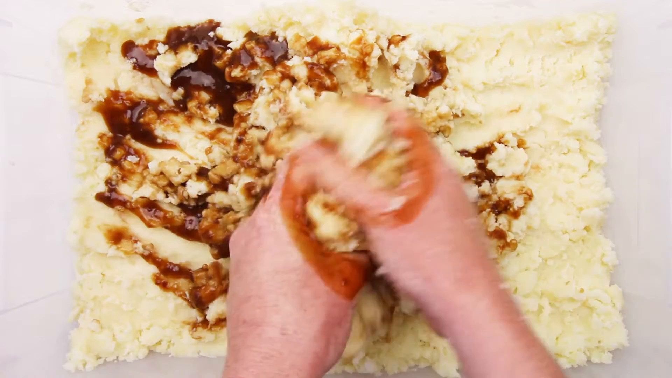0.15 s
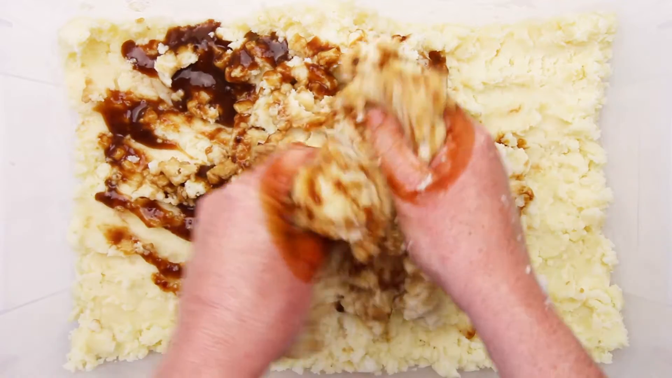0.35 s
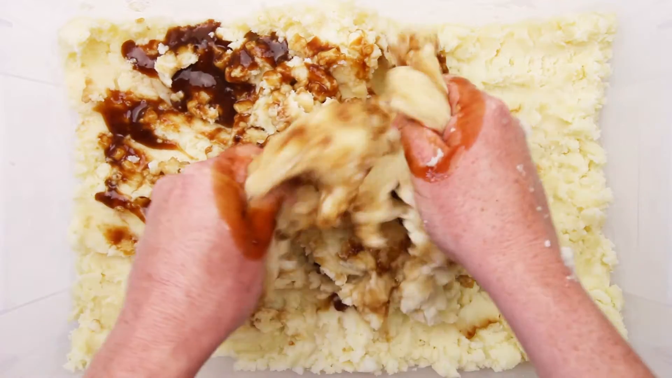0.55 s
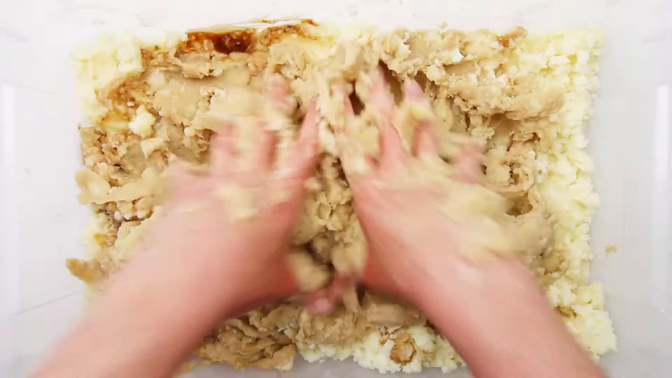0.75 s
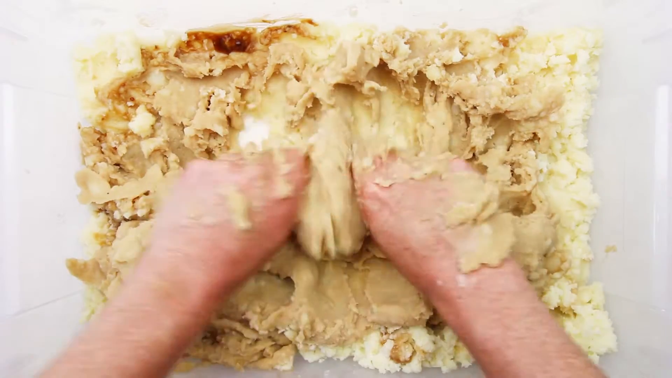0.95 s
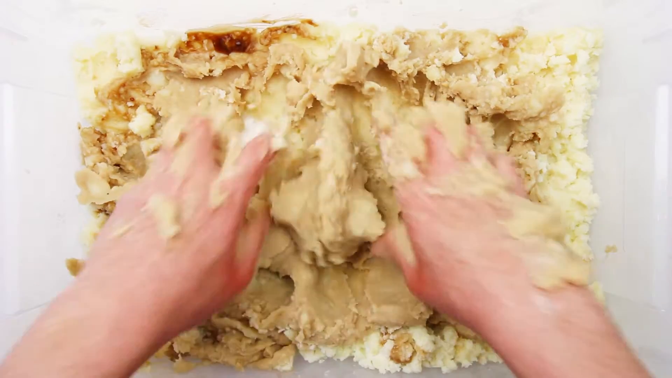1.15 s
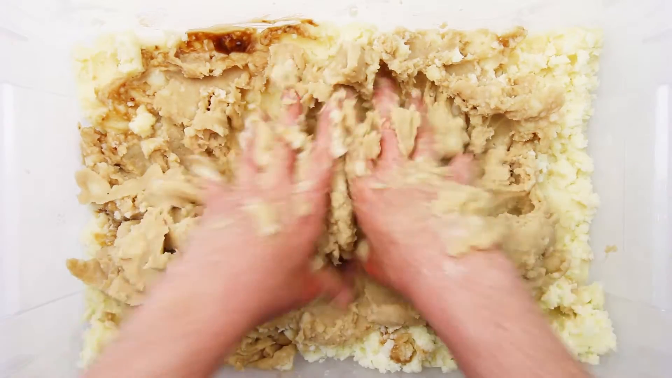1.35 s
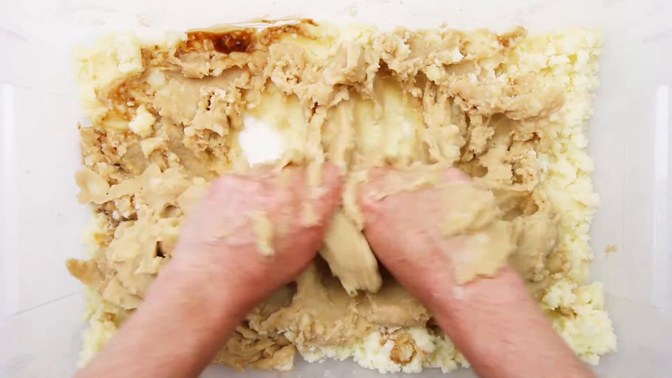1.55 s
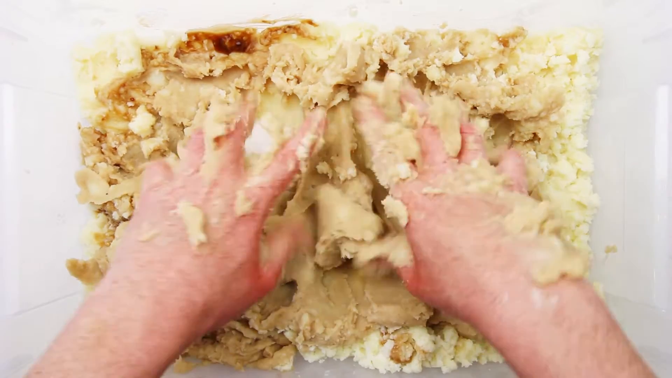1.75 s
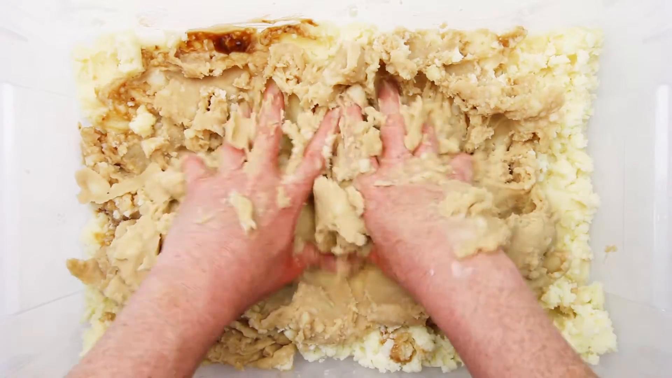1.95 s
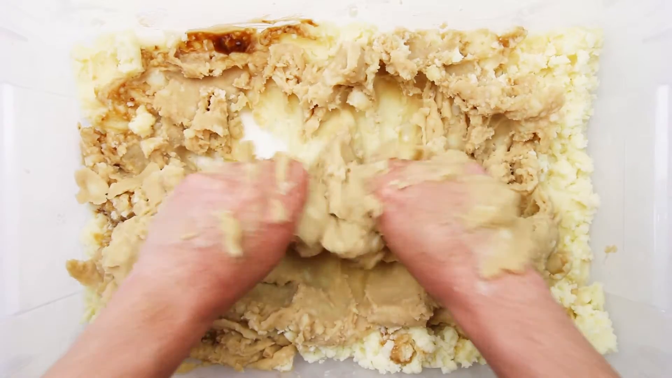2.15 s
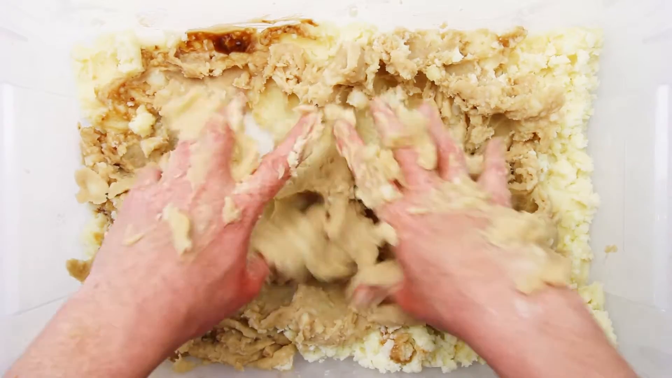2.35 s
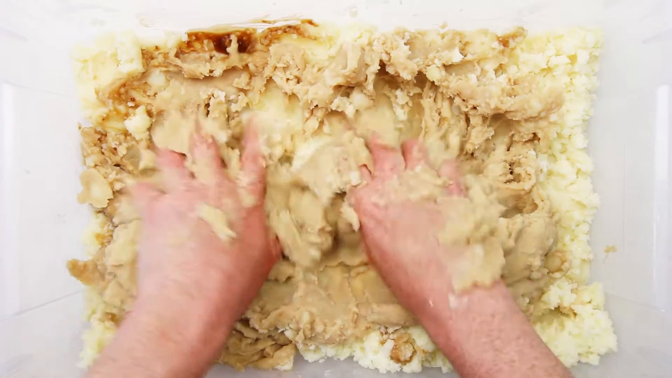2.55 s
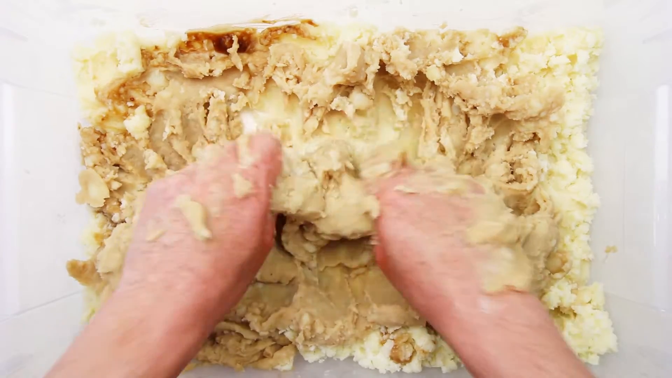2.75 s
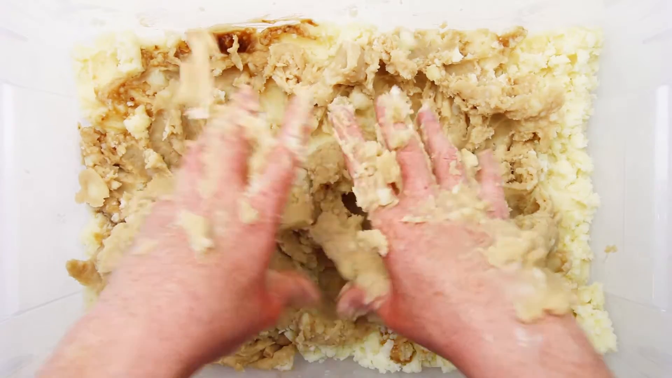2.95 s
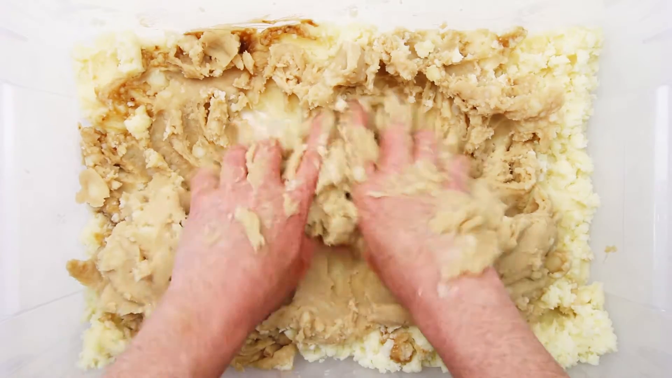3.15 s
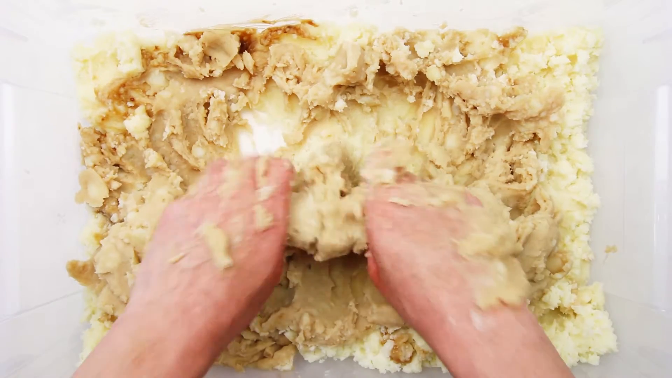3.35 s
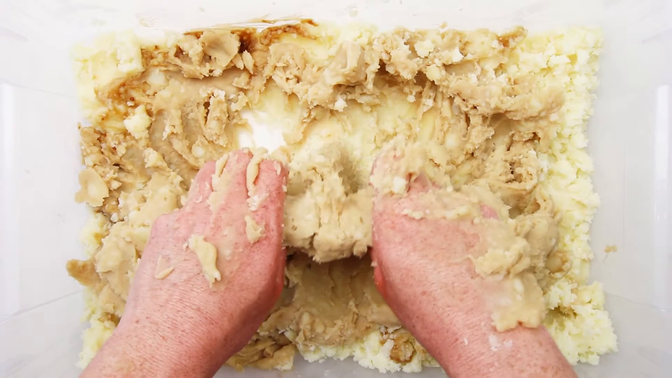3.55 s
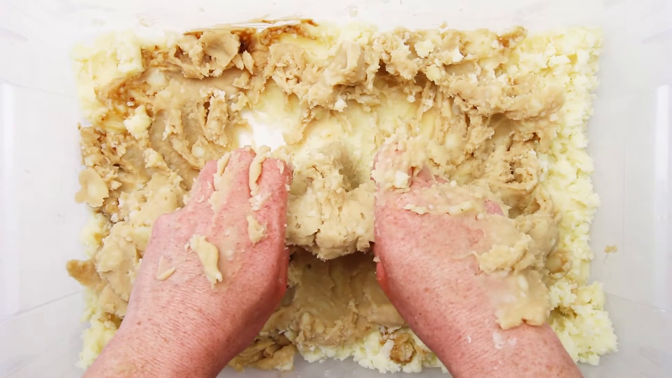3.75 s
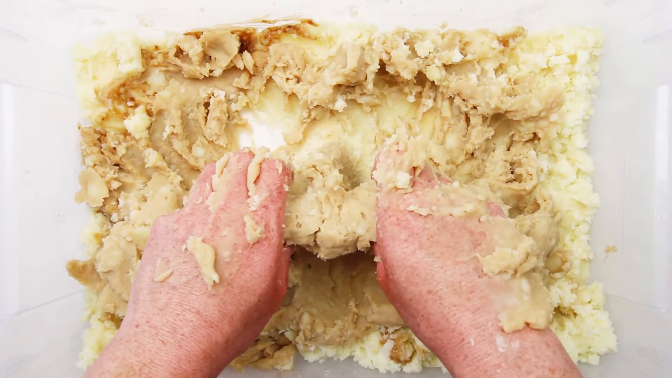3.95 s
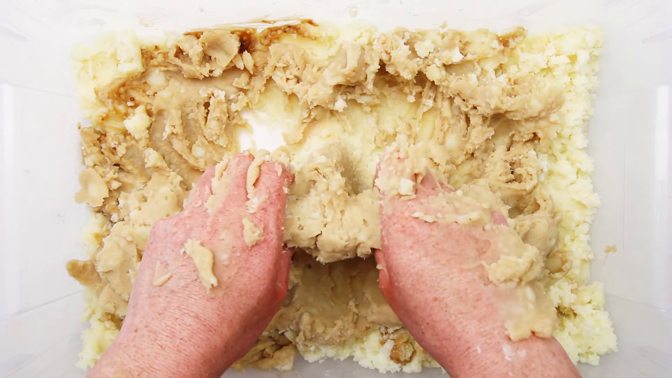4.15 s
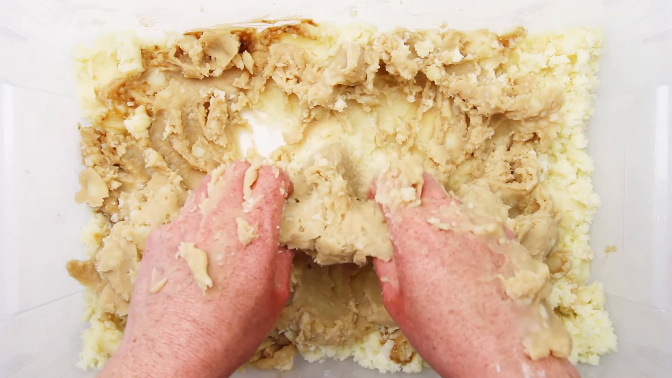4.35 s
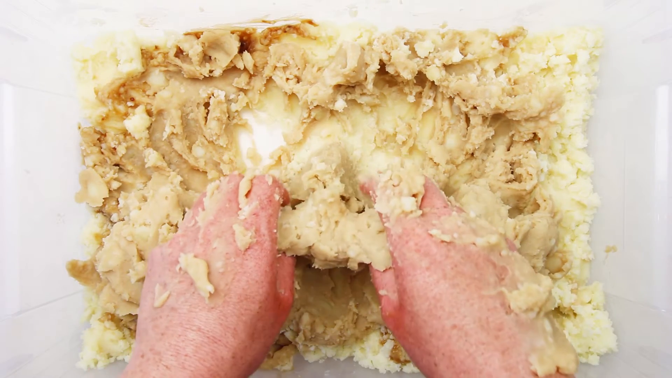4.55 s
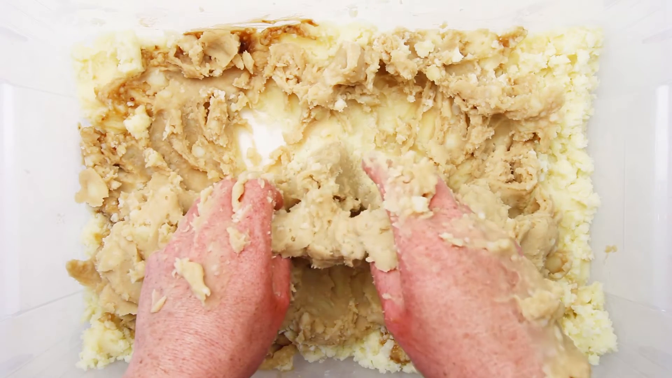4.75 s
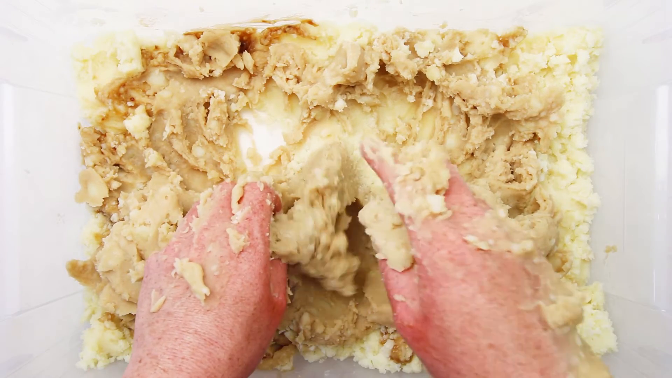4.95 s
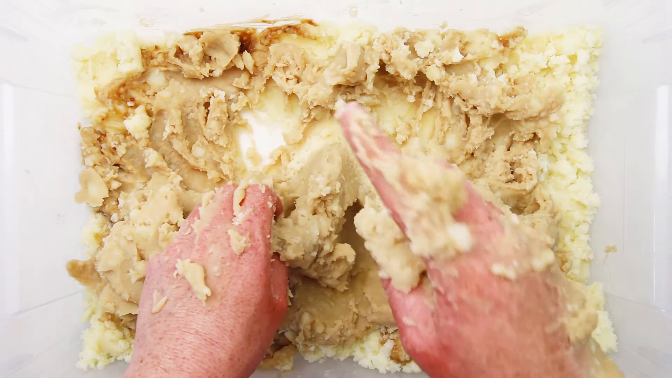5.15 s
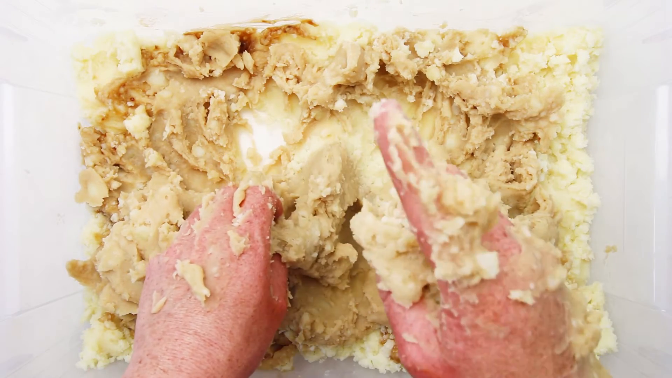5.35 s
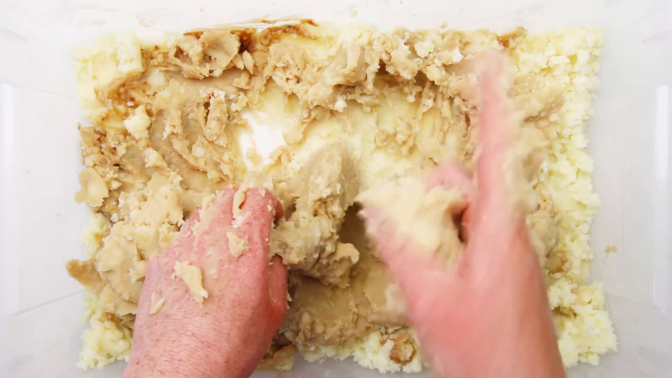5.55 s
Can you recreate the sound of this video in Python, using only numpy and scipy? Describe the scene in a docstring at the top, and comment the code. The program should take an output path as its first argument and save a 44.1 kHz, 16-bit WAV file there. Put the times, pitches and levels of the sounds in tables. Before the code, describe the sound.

Close, gooey kneading of thick wet paste with smacks, bubbly pops and spurts, fading after several squeezes to near quiet over soft hum.

```python
"""Bare hands knead wet mashed potato in a plastic tub close to a microphone, six squeezes in 3.4 s, then almost rest.
Each squeeze starts with tiny bubbles fizzing and wet films squelching (clumped noise bursts, short sines);
skin smacks free (filtered bursts), paste spurts (soft noise swells) and air pockets pop (sines rising in pitch).
After 3.6 s only faint fizz, small peels, smacks, pops and one weak spurt remain.
Throughout, a small hard room answers (decaying noise) and a motor hums far away over the hiss of the room."""
import sys
import numpy as np
from scipy import signal
from scipy.fft import rfft, irfft, next_fast_len
from scipy.io import wavfile
from scipy.ndimage import map_coordinates

SR = 44100
rng = np.random.default_rng(int(sys.argv[2]) if len(sys.argv) > 2 else 0)


def unload_audio(sound):
    """Save the sound as a 16-bit wav file, at the path given as the first command line argument."""
    columns = np.transpose(np.atleast_2d(sound))
    # keep every value between -1 and 1, then stretch to whole-number steps
    steps = np.round(np.clip(columns, -1, 1) * 32767)
    wavfile.write(sys.argv[1], SR, steps.astype(np.int16))


N = 246959  # samples
CLOCK = np.arange(0, N / SR + .002, .001)  # seconds, the time grid of the gestures


def amp(db):
    """Gain of a level in dB."""
    return 10 ** (np.asarray(db) / 20)


def unit(x):
    """Scaled to rms 1."""
    return x / np.sqrt(np.mean(x ** 2) + 1e-20)


def along(points, hz):
    """Values at hz, read between (Hz, value) points on a log frequency axis."""
    point_hz, value = np.transpose(points)
    return np.interp(np.log(hz + 1), np.log(point_hz + 1), value)


def wobble(rate):
    """A smooth random curve, rate knots a second."""
    knots = rng.standard_normal(int(N * rate / SR) + 4)
    return map_coordinates(knots, [np.arange(N) * rate / SR])


def coloured(x, spectrum):
    """x through a causal minimum-phase filter of energy 1, shaped like the spectrum."""
    size = 4096
    gain = amp(along(spectrum, np.fft.rfftfreq(size, 1 / SR)))
    # Folding the cepstrum onto positive time puts the energy at the start
    cepstrum = irfft(np.log(gain))
    cepstrum[1:size // 2] *= 2
    cepstrum[size // 2 + 1:] = 0
    kernel = irfft(np.exp(rfft(cepstrum)))[:size // 2]
    return signal.fftconvolve(x, kernel / np.linalg.norm(kernel))[:len(x)]


def bursts(shape, spiky_db):
    """Noise whose samples differ widely in size, rms 1."""
    boost_db = spiky_db * np.minimum(rng.exponential(size=shape[-1]), 5)
    return unit(rng.standard_normal(shape) * amp(boost_db))


def paste():
    """Each squeeze drives out small bubbles, works larger pockets and pushes the tub."""
    # Spectrum of the fizzing bubbles: frequency_hz, relative level_db [dB per Hz]
    fizz_spectrum = [(1200, -28), (2500, -11), (4000, -7.5), (6000, -2), (7300, 1), (8500, -5),
                     (10500, -15.5), (13000, -23.5), (15000, -48), (15600, -58)]
    # Spectrum of the squelching wet films: frequency_hz, relative level_db [dB per Hz]
    squelch_spectrum = [(120, -31), (300, 1.5), (600, 2.5), (1200, -3.5), (2200, -8), (4000, -7),
                        (8000, -35.5)]
    # Spectrum of the flexing tub floor: frequency_hz, relative level_db [dB per Hz]
    tub_spectrum = [(15, -1.5), (50, -20), (100, -14), (130, 1), (165, -14), (270, -11), (500, -44)]
    fizzing, squelching, pushing = effort()
    flow = wobble(25.04)  # shared by fizz and squelch
    fizz = fizzing * amp(1.16 * flow) * crackle(fizz_spectrum, spiky_db=4.0, clump_db=2.0, clump_rate=140)
    squelch = squelching * amp(0.72 * flow)
    squelch = squelch * crackle(squelch_spectrum, spiky_db=3.0, clump_db=4.0, clump_rate=70)
    push = pushing * crackle(tub_spectrum, spiky_db=3.0, clump_db=2.0, clump_rate=8.38)
    blips = bubbles(count=6700, centre_hz=2870, spread=0.602, cycles=1.03, spiky_db=4.5)
    blips = np.sqrt(fizzing * squelching) * amp(-4.0) * blips
    return fizz + blips + squelch + push


def effort():
    """Gains of fizz, squelch and push: the gestures of the hands over the settling paste."""
    # Squeezes: land_s, land_fizz_db, land_squelch_db (hands land), give_s, fizz_db, squelch_db (paste yields),
    # end_s (grip ends), weigh_s, push_db (full weight on the tub), lift_s (weight lifts)
    squeezes = [(0.07, -37.5, -45, 0.2, -42, -43, 0.36, 0.04, -57, 0.1),
                (0.94, -35.5, -35.5, 1.016, -36, -36.5, 1.115, 1, -45, 1.0),
                (1.509, -32.5, -37, 1.585, -36.5, -37.5, 1.70, 1.55, -42, 1.57),
                (2.046, -36, -39, 2.146, -38, -36, 2.296, 2.13, -48.5, 2.14),
                (2.617, -36.5, -36, 2.71, -35.5, -35, 2.816, 2.70, -44.5, 2.82),
                (3.233, -34.5, -44, 3.34, -34.5, -34, 3.35, 3.31, -43, 3.37)]
    # Hands peeling off or shifting without pressure: start_s, end_s, fizz_db, squelch_db, sag_db_per_s
    peels = [(0.0, 0.057, -46, -51, 10), (0.415, 0.77, -45.5, -55.5, 12), (1.205, 1.325, -37.5, -50.5, 74),
             (1.794, 1.895, -38.5, -56, 90), (2.384, 2.506, -37.5, -54, 65), (2.90, 3.01, -39, -52, 49.5),
             (3.432, 3.53, -43.5, -50, 66), (4.382, 4.437, -55, -74, 5), (4.65, 4.75, -59, -72, 20),
             (4.83, 4.925, -58, -69, 24), (5.13, 5.15, -58.5, -72, 20), (5.23, 5.25, -58, -75, 20)]
    # Slopes of each gesture: rise dB per s, sag dB per s while held, fall dB per s
    landing, yielding, weight = (710, 0, 152), (216, 40, 207), (250, 38, 170)
    peel_rise_db_per_s, peel_fall_db_per_s = 224, 238
    approach_db, approach_db_per_s = -15.5, 200  # fizz just ahead of a landing, relative to it
    squelch_sag = 1.44  # while the paste yields, the squelch sags faster than the fizz
    settling_fizz_db, settling_squelch_db, settling_push_db = -62, -65, -66  # between gestures
    still_s, still_fizz_db = 3.6, -69.5  # kneading has stopped

    # Gestures add up as powers
    kneading = CLOCK < still_s
    fizz = amp(np.where(kneading, settling_fizz_db, still_fizz_db)) ** 2
    squelch = kneading * amp(settling_squelch_db) ** 2
    push = kneading * amp(settling_push_db) ** 2
    rise, sag, fall = yielding
    for land, land_fizz_db, land_squelch_db, give, fizz_db, squelch_db, end, weigh, push_db, lift in squeezes:
        fizz = fizz + gesture(land, land, land_fizz_db + approach_db, approach_db_per_s, 0, fall)
        fizz = fizz + gesture(land, land, land_fizz_db, *landing)
        fizz = fizz + gesture(give, end, fizz_db, *yielding)
        squelch = squelch + gesture(land, land, land_squelch_db, *landing)
        squelch = squelch + gesture(give, end, squelch_db, rise, squelch_sag * sag, fall)
        push = push + gesture(weigh, lift, push_db, *weight)
    for start, end, fizz_db, squelch_db, peel_sag in peels:
        slopes = peel_rise_db_per_s, peel_sag, peel_fall_db_per_s
        fizz = fizz + gesture(start, end, fizz_db, *slopes)
        squelch = squelch + gesture(start, end, squelch_db, *slopes)
    return [np.interp(np.arange(N) / SR, CLOCK, np.sqrt(power)) for power in (fizz, squelch, push)]


def gesture(start, end, db, rise, sag, fall):
    """Power of a level that rises to db at start, sags until end, then falls."""
    before = np.maximum(start - CLOCK, 0)
    held = np.clip(CLOCK - start, 0, max(end - start, 0))
    after = np.maximum(CLOCK - max(end, start), 0)
    lost_db = rise * before + sag * held + fall * after
    return amp(db - lost_db) ** 2


def crackle(spectrum, spiky_db, clump_db, clump_rate):
    """Dense bursts that come in clumps, rms 1."""
    clumped = bursts((N,), spiky_db) * amp(clump_db * wobble(clump_rate))
    return unit(coloured(clumped, spectrum))


def bubbles(count, centre_hz, spread, cycles, spiky_db):
    """Scattered single bubbles, each a few cycles at its own pitch, rms 1."""
    draw, t = rng.random((count, 3)), np.arange(320) / SR
    hz = np.clip(centre_hz * np.exp(spread * rng.standard_normal((count, 1))), 900, 9000)
    size = amp(-spiky_db * np.log(draw[:, 1:2] + 0.012))
    size = size * np.sqrt(hz / centre_hz)  # long low bubbles start weaker
    ring = size * np.sin(2 * np.pi * hz * t) * np.exp(-t * hz / cycles)
    at = (draw[:, :1] * N).astype(int) + np.arange(len(t))
    return unit(np.bincount(at.ravel(), ring.ravel())[:N])


def breaks():
    """Skin tears free in smacks, bright over a lower slap; paste spurts in soft swells of bright and low noise."""
    # Wet skin tearing free: start_s, level_db (before filtering), low_part_db (relative, before the slap gain)
    smacks = [(0.0361, -11.5, -17), (0.1845, -25.5, -1), (0.2094, -22, -6), (0.2682, -21.5, -11),
              (0.3044, -24, -12), (0.3661, -24, -13), (0.384, -23, -4), (0.4693, -27, -5),
              (0.602, -28.5, -15), (0.6824, -27, -24), (0.7586, -20.5, -22), (0.9238, -21.5, -4),
              (0.9308, -6, -8), (1.1044, -14.5, -2.5), (1.305, -39, -15), (1.4887, -20, 1),
              (1.495, -6.5, -11.5), (1.5119, -16.5, -7.5), (1.5678, -21, -11), (1.941, -24.5, -18),
              (1.985, -36, -20), (2.0306, -29, -14), (2.05, -17, -11), (2.0735, -13, -6.5),
              (2.1362, -24, 5.5), (2.2333, -15.5, -9), (2.2535, -24.5, 3.5), (2.3113, -21.5, -10),
              (2.371, -19.5, -29), (2.3979, -16, -16), (2.609, -19, -12), (2.7718, -17, -4),
              (2.7786, -3.5, -13.5), (2.8113, -10, -8), (3.1682, -24.5, -24), (3.2314, -15.5, -10),
              (3.257, -15.5, -14), (3.2674, -17, -14.5), (3.3683, -15.5, -8), (3.3983, -11, -6),
              (3.979, -41, -20), (4.119, -44, -1), (4.317, -40.5, -20), (4.3803, -42, -10),
              (4.5719, -35, -15), (4.655, -42, -20), (4.729, -37, -26), (4.9247, -42, -15),
              (5.228, -35, -16), (5.3482, -39, -20.5)]
    # Paste spurting between the fingers: crest_s, level_db (before filtering),
    # low_part_db (relative, before the slap gain), width_s (standard deviation of the swell)
    spurts = [(0.231, -36.5, -12.5, 0.0086), (1.022, -36, -8.5, 0.023), (1.071, -33, -2.5, 0.003),
              (1.585, -32, -8.5, 0.013), (1.618, -35.5, -1.5, 0.0044), (1.638, -40, 10, 0.0022),
              (1.68, -40.5, 5.5, 0.0049), (1.815, -38.5, -13.5, 0.011), (2.176, -32, -6.5, 0.013),
              (2.268, -40, -1, 0.0078), (2.70, -28, -14, 0.0086), (2.722, -25.5, -12, 0.013),
              (3.325, -30, -7, 0.0096), (4.42, -58, -15, 0.0084)]
    # Spectrum of the bright part: frequency_hz, relative level_db [dB per Hz]
    crack_spectrum = [(1200, -15.5), (2500, -2), (4500, -2.5), (7300, 0.5), (9000, -6.5), (11000, -20),
                      (15000, -36), (15600, -53)]
    # Spectrum of the low part: frequency_hz, relative level_db [dB per Hz]
    slap_spectrum = [(200, -33.5), (600, 2.5), (1300, 10), (2400, 0), (4500, -22)]
    smack_t60_s = 0.028
    drive, t = np.zeros((2, N + SR)), np.arange(SR // 8) / SR  # rows: bright, low
    for start, db, low_db in smacks:
        sudden = np.clip(amp(db + 11.5), .45, 1)  # strong smacks tear at once, weak ones peel
        rise = 1 - np.exp(-t * sudden / 0.00043)
        # A dying run of smaller breaks
        run = 0.38 * bursts((2, len(t)), spiky_db=3.5) * rise * amp(-60 * t / smack_t60_s)
        # The first break is an up-down pair; the last pulse is its echo off the tub wall
        run[:, [20, 25, 112]] += sudden * np.array([.9, -1.1, .6])
        drive[:, round(start * SR):][:, :len(t)] += amp([[db], [db + low_db]]) * run
    for crest, db, low_db, width in spurts:
        swell = np.exp(-((t - t.mean()) / width) ** 2 / 2)
        spurt = swell * bursts((2, len(t)), spiky_db=2.5)
        drive[:, round((crest - t.mean()) * SR):][:, :len(t)] += amp([[db], [db + low_db]]) * spurt
    bright = coloured(drive[0, :N], crack_spectrum)
    low = amp(2.5) * coloured(drive[1, :N], slap_spectrum)
    return bright + low


def pops():
    """A pocket rings for a few cycles, its pitch rising as it shrinks."""
    # Air pockets closing and lumps landing: start_s, level_db (before the swell), pitch_hz (at the start)
    pockets = [(.036, -32.5, 435), (.0735, -30, 3420), (.0885, -38, 2420), (.124, -36, 2290),
               (.305, -39, 614), (.335, -36.5, 2560), (.471, -37.5, 550), (.932, -27.5, 506),
               (1.036, -28.5, 423), (1.082, -20, 683), (1.497, -27, 443), (2.049, -33, 670),
               (2.233, -33.5, 350), (2.7127, -15, 358), (2.739, -23, 270), (2.778, -15.5, 590),
               (2.811, -18, 680), (3.026, -22.5, 263.5), (3.116, -36.5, 257.1), (3.168, -33.5, 217),
               (3.1685, -32, 4160), (3.239, -28, 457), (3.259, -27.5, 527), (3.632, -40, 420),
               (3.791, -51, 1900), (3.825, -49, 1800)]
    t60_at_1khz_s, shortening = 0.018, 0.35  # power of the pitch by which the ring shortens
    out, t = np.zeros(N + SR), np.arange(SR // 6) / SR
    for start, db, hz in pockets:
        t60 = t60_at_1khz_s * (hz / 1000) ** -shortening
        phase = 2 * np.pi * hz * (t + 3 * t * t)
        swell = amp(-60 * t / max(t60, .006)) * (1 - np.exp(-t * hz / 0.44))
        ring = np.sin(phase) + 0.29 * np.sin(2.28 * phase)
        out[round(start * SR):][:len(t)] -= amp(db) * 2 * swell * ring
    return out[:N]


def room(x):
    """The walls answer with a fresh noise tail every quarter second, as the hands move."""
    # Decay of the small hard room: frequency_hz, t60_s
    decay = [(200, 0.35), (1500, 0.19), (8000, 0.14)]
    out, step = np.zeros(N + SR), SR // 4
    for start in range(0, N, step):
        hz, t, noise = signal.stft(rng.standard_normal(SR // 2), SR, nperseg=256)
        fade = amp(-60 * t / along(decay, hz)[:, None])
        tail = signal.istft(noise * fade, SR, nperseg=256)[1]
        wet = signal.fftconvolve(x[start:start + step], tail / np.linalg.norm(tail))
        out[start + 150:][:len(wet)] += wet  # 150 samples (3.4 ms) until the walls answer
    return out[:N]


def background():
    """Smooth hiss and the slightly unsteady orders of a motor."""
    # Spectrum of the room hiss: frequency_hz, relative level_db [dB per Hz]
    hiss_spectrum = [(15, -31), (25, -15), (56, -8.5), (144, -5), (378, -9.5), (482, -8), (582, -11.5),
                     (1750, -15), (5720, -22), (10300, -32), (15500, -41.5)]
    # Orders of the motor hum: multiple of the turning rate, level_db [rms, before the wobble]
    motor_orders = [(1, -59), (2, -66), (10, -67.5), (35, -87), (36, -73), (40, -89), (44, -76.5),
                    (47, -80)]
    motor_hz, hiss_db = 48.73, -54.5  # hiss in dB rms
    turn = 2 * np.pi * motor_hz * np.arange(N) / SR
    hum = np.zeros(N)
    for order, db in motor_orders:
        level = np.sqrt(2) * amp(db + 1.7 * wobble(12))
        hum += level * np.sin(order * turn + 0.25 * wobble(5.5))
    hiss = amp(hiss_db) * unit(coloured(rng.standard_normal(N), hiss_spectrum))
    return hum + hiss


def scene():
    """Hands near the microphone, their room 10 dB down, the background."""
    hands = paste() + breaks() + pops()
    return (hands + amp(-10) * room(hands) + background())[None]


def record(dry):
    """Nothing is kept above the band limit."""
    top_hz = 15640
    size = next_fast_len(N + 8192)
    kept = np.fft.rfftfreq(size, 1 / SR) < top_hz
    return irfft(rfft(dry, size) * kept, size)[:, :N]


dry = scene()
out = record(dry)
unload_audio(out)
```